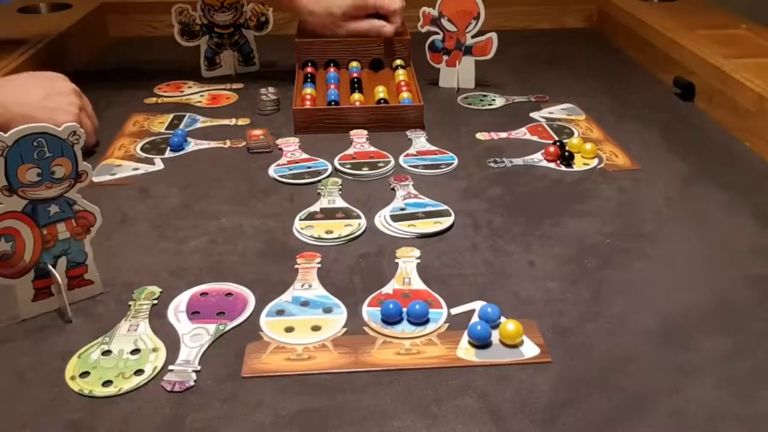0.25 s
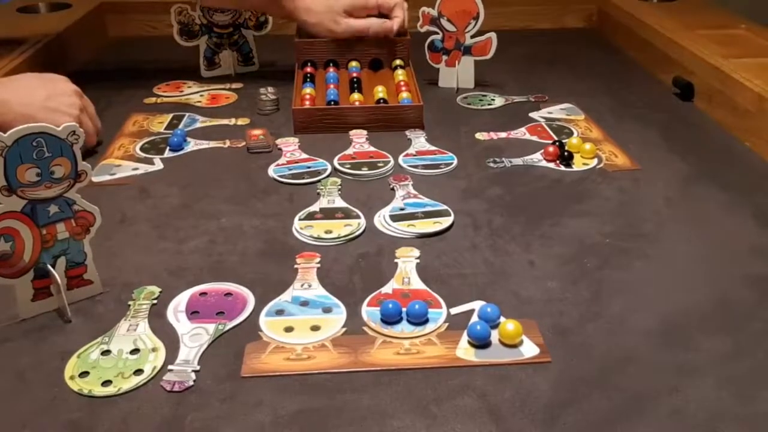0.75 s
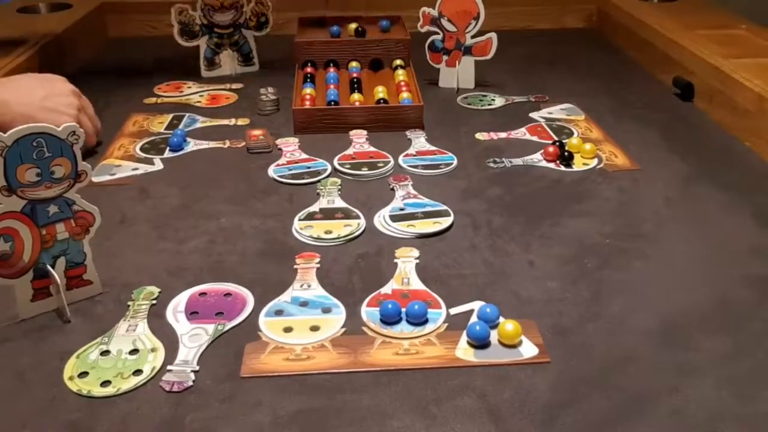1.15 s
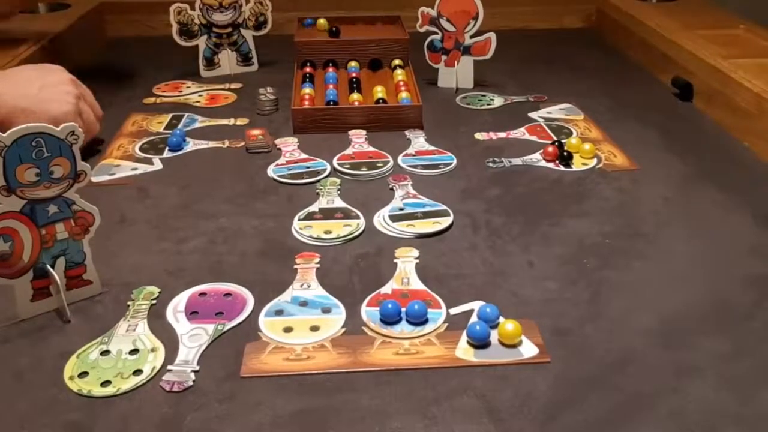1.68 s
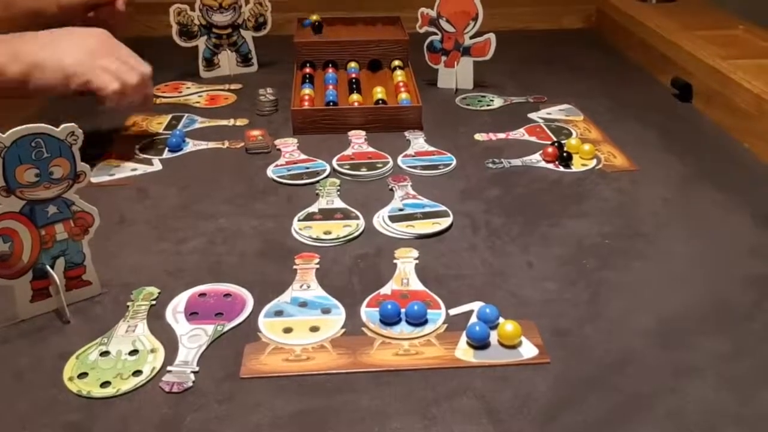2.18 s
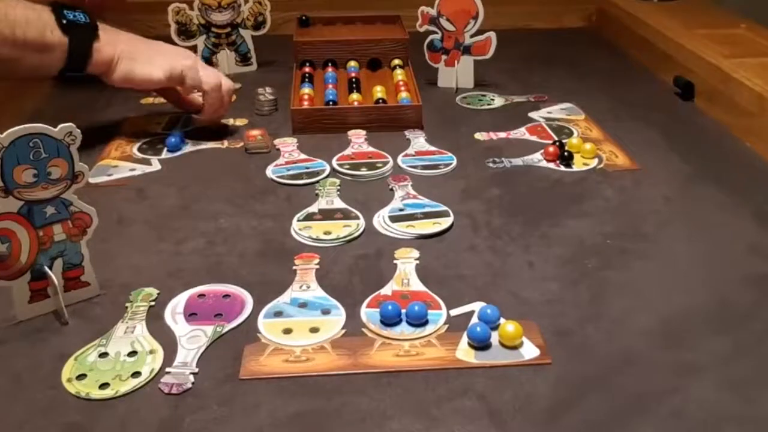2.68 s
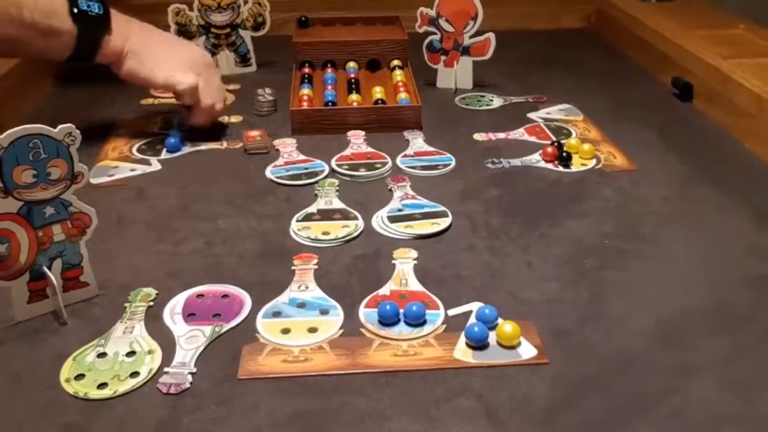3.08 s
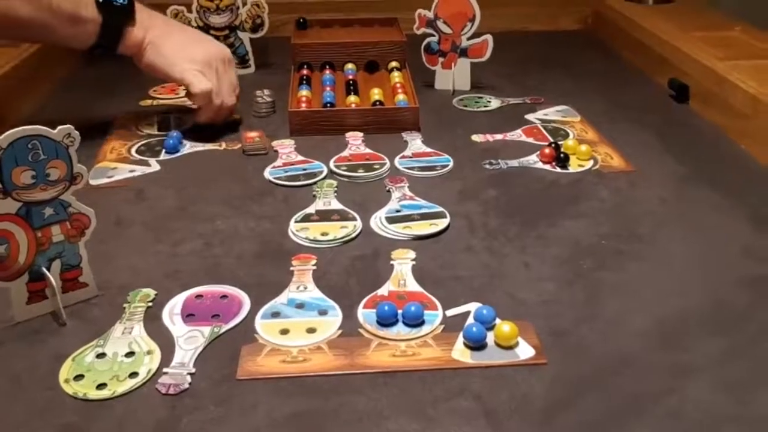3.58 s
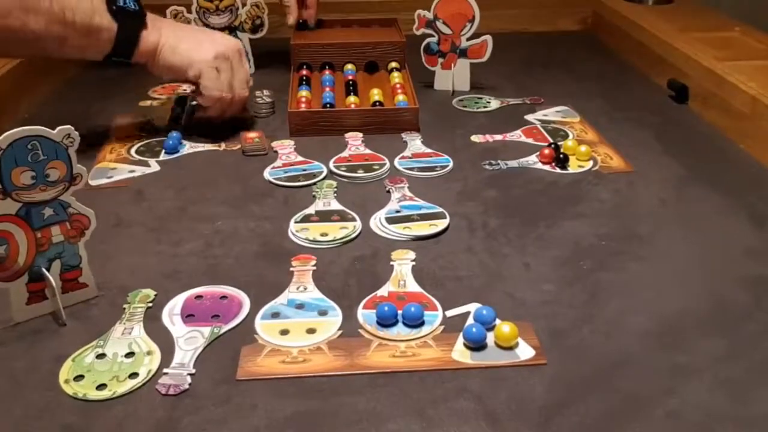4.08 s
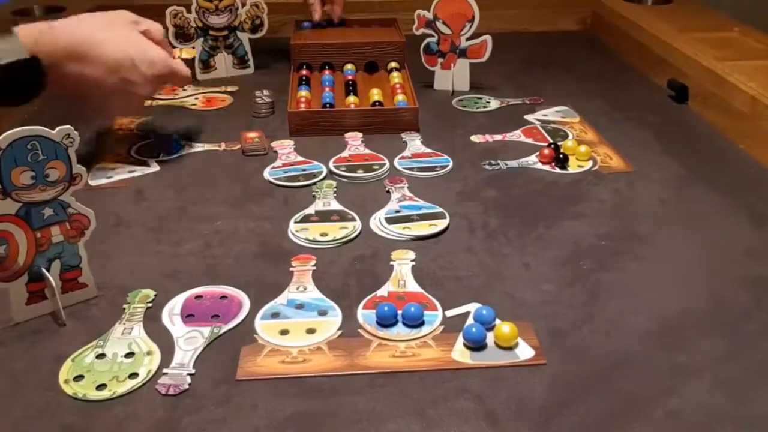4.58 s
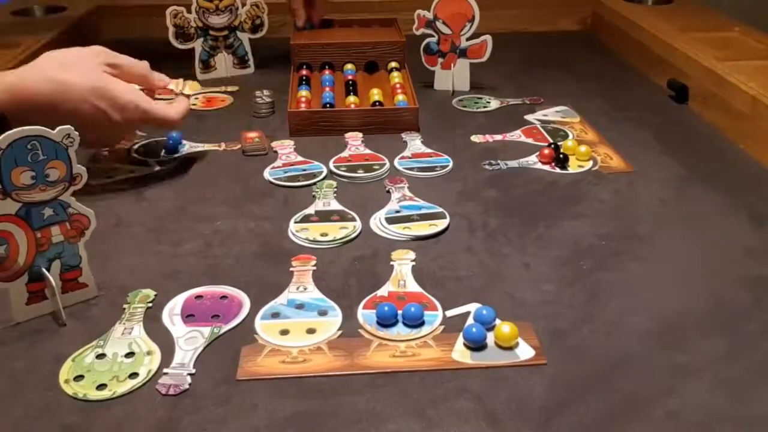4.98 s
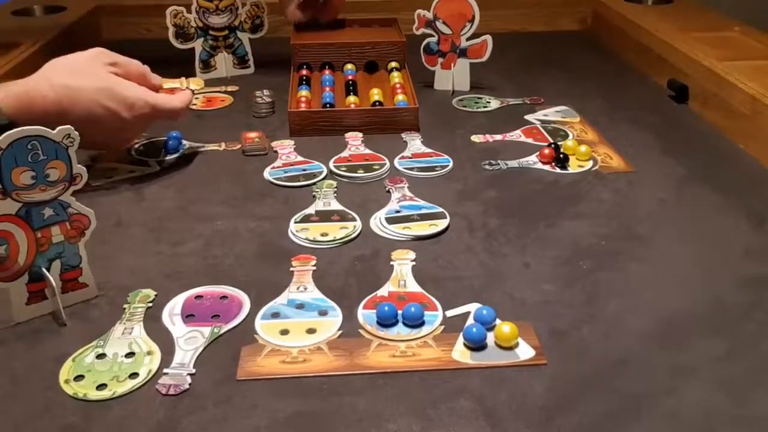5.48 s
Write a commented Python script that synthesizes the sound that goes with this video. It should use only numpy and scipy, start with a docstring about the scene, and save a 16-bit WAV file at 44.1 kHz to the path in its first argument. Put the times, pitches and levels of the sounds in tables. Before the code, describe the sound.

Fingers softly shift glass marbles in a palm, then several drop on a cardboard dispenser with sharp, hollow knocks. They roll and rattle down inside, clacking on other marbles, with another tumble soon after. A near-silent pause follows, then a faint hand rustle and a last short clatter. Soft bumps come from the padded table. Close stereo microphone in a small quiet room, box slightly left.

```python
"""Glass marbles drop on the lid of a cardboard dispenser, roll about, fall through holes and knock down the
chutes onto other marbles; hands rustle on the box and bump the padded table softly. Two microphone ports stand
close by in a small quiet room, the box a little to their left. Card is damped modes set ringing by knocks,
faint ticks and fine grains, glass is short shaped pulses with scatter, the table is low modes and dull noise,
the room a tail of noise and standing waves, and the background steady shaped noise."""
import sys
import numpy as np
from scipy import signal
from scipy.fft import rfft, irfft, next_fast_len
from scipy.io import wavfile

SR = 44100
rng = np.random.default_rng(int(sys.argv[2]) if len(sys.argv) > 2 else 0)


def digitize_waveform(pressure):
    """Quantize a signal to 16-bit integers and store it at the path in sys.argv[1].

    Rows of a 2-D input are taken as channels; values are limited to [-1, 1].
    """
    field = np.atleast_2d(pressure).T
    bounded = np.clip(field, -1, 1)
    quanta = np.round(bounded * 32767).astype(np.int16)
    wavfile.write(sys.argv[1], SR, quanta)


N = 253484


def from_db(db):
    """Decibels to gain."""
    return 10 ** (np.asarray(db) / 20)


def rms_one(x):
    """Scale to unit rms."""
    return x / np.sqrt(np.mean(x ** 2) + 1e-20)


def level(paths):
    """Summed gain in time of several level paths, each silent outside its own rows."""
    t, gain = np.arange(N) / SR, 0
    for rows in paths:
        s, db = np.transpose(rows)
        gain = gain + from_db(np.interp(t, s, db, left=-200, right=-200))
    return gain


def at_hz(points, hz):
    """Read a table on a log-frequency axis."""
    return np.interp(np.log(hz), np.log(np.array(points)[:, 0]), np.array(points)[:, 1])


def convolve(x, response):
    """Causal convolution, cut to length."""
    size = next_fast_len(N + response.shape[-1])
    return irfft(rfft(x, size) * rfft(response, size), size)[..., :N]


def band_pass(x, order, low_hz, high_hz):
    """Keep one band of a sound."""
    return signal.sosfilt(signal.butter(order, [low_hz, high_hz], "band", fs=SR, output="sos"), x)


def high_pass(x, order, hz):
    """Take the bass out of a sound."""
    return signal.sosfilt(signal.butter(order, hz, "high", fs=SR, output="sos"), x)


# Left-right likeness of diffuse sound at the two ports: pitch_hz, likeness [0 to 1]
PORT_LIKENESS = [(60, 0.48), (250, 0.94), (600, 0.35), (1500, 0.062), (12000, 0.015)]


def bands(size, shape):
    """Half-octave bands of stereo noise with diffuse likeness, each weighted by shape(hz)."""
    out, edges = 0, 20 * 2 ** np.arange(0, 10, .5)
    white = rng.standard_normal((2, 2, size))
    for k, (low, high) in enumerate(zip(edges, edges[1:])):
        mid, side = band_pass(white[k % 2], 2, low, high)
        hz = np.sqrt(low * high)
        alike = np.clip(at_hz(PORT_LIKENESS, hz), 0, 1)
        out = out + shape(hz) * (np.sqrt(1 + alike) * mid + np.sqrt(1 - alike) * side * [[1], [-1]])
    return out


def grains(per_s, spread_db):
    """Random small impacts of uneven size; rms 1."""
    sizes = from_db(spread_db * np.minimum(rng.exponential(1, N), 4)) * rng.choice([-1, 1], N)
    return rms_one(sizes * (rng.random(N) < per_s / SR))


def ring(clicks, hz, width_hz):
    """A click sets a damped sine ringing; the wider the mode, the faster it dies."""
    r, w = np.exp(-np.pi * width_hz / SR), 2 * np.pi * hz / SR
    return signal.lfilter([0, np.sin(w)], [1, -2 * r * np.cos(w), r * r], clicks + 1e-18)


# Card takes up a blow gradually: delay, and the extra width that sets how fast a mode swells
CARD_CONTACT_S, CARD_RISE_HZ = .0017, 645


def swell(clicks, hz, width_hz):
    """A damped sine that swells before it dies: a slow ring less a fast one."""
    return ring(clicks, hz, width_hz) - ring(clicks, hz, width_hz + CARD_RISE_HZ)


# Knocks of marbles on card, and faint ticks at 0.804 and 2.64 s, levels before later gains: start_s [s],
# ring_db [dB, ring of the card], pitch_hz [Hz, favoured pitch], click_db [dB, bright click],
# rest_db [dB, modes away from that pitch]
KNOCKS_AND_TICKS = [(0.214, -48.5, 364, -62, -13), (0.535, -8, 1460, -18, -6),
                    (.583, -7, 1474, -21.5, -9.5), (0.612, -14, 1300, -41, 5),
                    (0.634, -23.5, 1435, -29.5, -13), (0.746, -24, 1410, -36.5, -24),
                    (0.758, -26, 1430, -49, -18.5), (0.804, -35.5, 1430, -50.5, -11.5),
                    (.824, -1.5, 1483, -15, -12), (.844, -1.5, 1420, -18.5, -2.5),
                    (.862, -4, 1530, -16, -24), (.933, -17.5, 1300, -64.5, -8),
                    (.964, -19, 1004, -61.5, -1.5), (1.101, -32, 916, -54, -3.5),
                    (1.158, -24, 1300, -60, -10.5), (1.243, -27.5, 1328, -44, -3.5),
                    (1.359, -32, 1121, -57.5, -0.5), (1.406, -30.5, 1090, -56, 1),
                    (1.499, -30, 665, -50.5, 3.5), (1.557, -21, 1108, -34.5, -9.5),
                    (1.594, -15, 1400, -26.5, -7), (1.618, -16.5, 834, -61.5, -6.5),
                    (1.639, -3.5, 642, -16.5, -10.5), (1.675, -13.5, 1197, -47, -9),
                    (1.707, -9, 820, -20, 5.5), (1.808, -17.5, 1550, -35.5, -5),
                    (1.916, -18, 864, -26.5, -7), (2.026, -31, 824, -33.5, -2),
                    (2.208, -35, 1135, -60.5, -9.5), (2.312, -33, 1098, -60, -10.5),
                    (2.381, -29, 898, -48, -9), (2.43, -28.5, 837, -34, -10.5),
                    (2.502, -26.5, 850, -30, -7.5), (2.515, -28, 665, -47.5, -5),
                    (2.64, -44, 1507, -52.5, -9.5), (2.657, -2, 935, -15.5, -10),
                    (2.668, -5, 601.6, -27.5, -13), (2.723, -11, 1882, -33.5, -5.5),
                    (2.743, -5, 591, -22, -7.5), (2.798, -13.5, 993, -28.5, -2),
                    (2.913, -29, 3640, -41.5, -30), (4.072, -33, 840, -40.5, -13),
                    (4.086, -39, 670, -42, -37), (4.396, -33.5, 1847, -48.5, -20.5),
                    (4.437, -26, 1089, -36, -16), (4.486, -35, 1113, -53.5, -19.5),
                    (4.618, -11, 1243, -23, -10), (4.63, -17, 1138, -26, -10),
                    (4.66, 0.5, 642.6, -13.5, -6.5), (4.673, -25.5, 643, -52, -5),
                    (4.689, -24, 1420, -36.5, -6), (4.728, -17.5, 657, -57.5, -7.5),
                    (4.759, -7.5, 610, -24, -6), (4.802, -12, 950, -27.5, -4.5),
                    (4.828, -32.5, 3300, -39, -11), (4.867, -21, 2300, -39, -11.5),
                    (5.022, -42, 934, -54, -31), (5.209, -50, 921, -62, -10), (5.229, -53, 990, -64.5, -14),
                    (5.698, -27.5, 1350, -43.5, -10), (5.735, -33, 950, -43, -2)]


def strikes(gains):
    """One click per knock or tick, late by the contact time of card."""
    clicks = np.zeros(N)
    clicks[np.round((np.array(KNOCKS_AND_TICKS)[:, 0] + CARD_CONTACT_S) * SR).astype(int)] = gains
    return clicks


# Dispenser modes, before damping: pitch_hz [Hz], width_hz [Hz], level_db [relative dB]
BOX_MODES = [(114, 66, -16.5), (193.3, 4.8, -17.5), (280, 10, -12), (362.4, 24, -7), (454.6, 7.3, -13),
             (427, 160, -4.5), (483, 68, -8), (550, 71, -1.5), (595.6, 96, 0), (634, 460, 3),
             (671.5, 17, -3.5), (784.2, 39, 1), (835.6, 31, 2.5), (927, 43, -3), (1015, 53, 7.5),
             (1074, 63, 6.5), (1172, 49, 4), (1218, 100, 1), (1330, 62, 4), (1453, 39, 3), (1517, 150, 8.5),
             (1785, 110, -1), (1790, 110, -1), (1857, 51, 1.5), (2013, 51, -3.5), (2173, 70, 2),
             (2313, 100, 4.5), (2460, 82, 0), (2560, 360, -4.5), (2950, 130, -0.5), (3190, 28, -7),
             (3250, 96, -9.5), (3602, 70, -8.5), (4170, 80, -9), (4670, 87, -6)]
HOLLOW_TOP_HZ = 1200   # modes of the hollow lie below, those of the panels above
# A blow on the hollow also rings a panel, higher up; the answer shifts with the strength of the blow
PANEL_ANSWER_DB, OVERTONE, PANEL_LOW_HZ, PANEL_TOP_HZ = 0, 2.1, 1745, 2040
PANEL_PER_DB, FIRM_KNOCK_DB = -0.1241, -11
HOLLOW_ANSWER_DB, HOLLOW_ANSWER_HZ = -10.5, 932   # a blow on a panel also rings the hollow
ANSWER_FOLLOWS = 0.3   # a blow that keeps to its spot also reaches the other part of the box less
LID_HZ, LID_OCTAVES, LID_SHARE = 363, .15, 0.54   # the whole lid flexes under landing marbles


def lid_flex(hz):
    """How much each mode shares in the flexing of the whole lid."""
    return 1 / (1 + (np.log2(hz / LID_HZ) / LID_OCTAVES) ** 2)


def knock_gains(reach_octaves=0.091):
    """Each knock or tick (row) favours the modes (columns) near its own pitch, in hollow and panel."""
    _, peak, pitch_hz, _, rest_db = np.array(KNOCKS_AND_TICKS).T[:, :, None]
    hz, _, db = np.transpose(BOX_MODES)
    deep, low = pitch_hz < HOLLOW_TOP_HZ, hz < HOLLOW_TOP_HZ
    kept_db = ANSWER_FOLLOWS * (rest_db + 8)
    panel_answer_db = PANEL_ANSWER_DB + PANEL_PER_DB * (peak - FIRM_KNOCK_DB) + kept_db
    hollow_db = np.where(deep, 0, HOLLOW_ANSWER_DB + kept_db)
    panel_db = np.where(deep, panel_answer_db, 0)
    hollow_hz = np.where(deep, pitch_hz, HOLLOW_ANSWER_HZ)
    panel_hz = np.where(deep, np.clip(OVERTONE * pitch_hz, PANEL_LOW_HZ, PANEL_TOP_HZ), pitch_hz)
    away = np.log2(hz / np.where(low, hollow_hz, panel_hz)) / reach_octaves
    heft = np.where((hz < 700) & deep, from_db(0.27 * (peak + 15.0)), 1)   # heavy blows move the whole box
    rest = from_db(rest_db)
    spot = rest * heft + 1 / (1 + away ** 2) ** 2   # every mode answers a little
    spot = spot + LID_SHARE * lid_flex(hz) * rest * ~deep
    side = np.sign(rng.standard_normal(away.shape))   # the spot lies on either side of a mode's nodal lines
    share = from_db(db + 2.5 * rng.standard_normal(away.shape)) * spot * side
    hollow_norm = np.linalg.norm(share * low, axis=1, keepdims=True)
    panel_norm = np.linalg.norm(share * ~low, axis=1, keepdims=True)
    share = share / np.where(low, hollow_norm, panel_norm)
    return share * from_db(peak + np.where(low, hollow_db, panel_db))


# Heavy blows shove the whole box; the thump grows faster than the blow
THUMP_HZ, THUMP_WIDTH_HZ, THUMP_DB, THUMP_GROWTH = 470, 370, -5, 1.0


def box_thump():
    """Knocks on the hollow shove the whole box: one broad, short, dull mode."""
    _, peak, pitch_hz, _, _ = np.transpose(KNOCKS_AND_TICKS)
    gains = (pitch_hz < HOLLOW_TOP_HZ) * from_db(peak + THUMP_DB + THUMP_GROWTH * (peak + 4))
    return swell(strikes(gains), THUMP_HZ, THUMP_WIDTH_HZ)


# Fine contact on card, before later gains: marbles rolling, and in the second path (4.0 to 4.07 s)
# a hand rustling on the box; one path per list: start_s [s], level_db [dB]
ROLLS_AND_HAND_RUSTLE = [
    [(.6, -54.5), (.72, -41), (.82, -48), (1.0, -44), (1.12, -43), (1.25, -43), (1.4, -48), (1.55, -43),
     (1.66, -34.5), (1.76, -28), (1.9, -51), (2.05, -45.5), (2.18, -57.5), (2.24, -49.5), (2.4, -48.5),
     (2.55, -52.5), (2.64, -66.5)],
    [(4.0, -85), (4.02, -64.5), (4.07, -83)],
    [(2.67, -50), (2.78, -42), (2.86, -47.5), (2.95, -48)],
    [(4.67, -33.5), (4.79, -39.5), (4.9, -55), (5.05, -60), (5.19, -80), (5.23, -68), (5.35, -97)],
]
FINE_TOP_HZ = 2600   # fine contact is too soft to ring the highest modes
LID_FINE_SHARE, LID_CLEAR_S = 2.5, 1.5   # the lid flexes under rolling marbles until the last ones leave it


def box(damping=1.523, fine_db=-36.5, fine_hz=890.0):
    """Knocks, ticks and the fine impacts of rolling and of a rustling hand ring the damped modes of the card."""
    hz, width_hz, db = np.transpose(BOX_MODES)
    gains = knock_gains()
    contact = level(ROLLS_AND_HAND_RUSTLE) * grains(per_s=500.0, spread_db=6.5)
    lid = 0.12 + 1 / (1 + (np.log2(hz / fine_hz) / 0.92) ** 2)   # fine contact drives the lid's own band
    soft = from_db(db + fine_db) * lid / (1 + (hz / FINE_TOP_HZ) ** 6)
    on_lid = np.arange(N) / SR < LID_CLEAR_S
    flexing = 1 + LID_FINE_SHARE * lid_flex(hz) ** 2 / lid
    rings = box_thump()
    for k in range(len(hz)):
        # each mode meets the grains a few samples later than the last
        rubbed = soft[k] * np.where(on_lid, flexing[k], 1) * np.roll(contact, 7 * k)
        rings = rings + swell(strikes(gains[:, k]) + rubbed, hz[k], damping * width_hz[k])
    return high_pass(rings, 4, 95.)   # a small box radiates no deep bass


# Marbles clacking on each other, before later gains: start_s [s], top_db [dB, top of the click],
# straight_db [dB, part that comes straight], top_hz [Hz, where the top starts], body_db [dB against the top]
MARBLE_CLACKS = [(0.059, -52, -17, 5150, -14), (0.254, -46.5, -19, 5960, -9),
                 (0.309, -50, -15.5, 5850, -6.5), (0.366, -47, -21.5, 5820, -7),
                 (0.466, -42.5, -20, 5620, -14), (0.485, -47, -14.5, 5630, -15),
                 (1.213, -65.5, -12.5, 5900, 16), (1.674, -18.5, -30, 6000, -18),
                 (2.377, -37, -16.5, 6000, -9), (2.72, -27.5, -20.5, 6100, -7.5),
                 (2.913, -32, -6, 6980, -6), (4.729, -30.5, -17, 6040, -22.5), (4.867, -31, -5.5, 6720, -7)]
# Click of glass: pitch_hz [Hz], level_db [relative dB per Hz]
GLASS_COLOUR = [(150, -23), (500, -1.5), (1500, 4.5), (2500, 5.5), (4000, 7.5), (5500, 2.5), (7500, -3),
                (10000, -11), (13000, -13), (15000, -30.5), (16500, -24)]
CONTACT_S = .0018   # delay for a contact to build up
SHEEN_HZ = 6000   # the top of a knock's click starts here
# Card dulls the top of a click, the more the softer it is
KNOCK_SHEEN_DB, SHEEN_PER_DB, FIRM_CLICK_DB = -8.5, 0.1, -18
KNOCK_STRAIGHT_DB = -15   # the walls of the box hide part of each click from view
KNOCK_SCATTER_S, CLACK_SCATTER_S = 0.01, .002   # a click inside the box scatters longer


def glass_clicks(scatter=4.02, beam_db=5.0, click_db=3.0):
    """A sharp pulse and its scatter off nearby marbles; returns direct sound and room feed."""
    knocks = [(s, db, db + KNOCK_SHEEN_DB + SHEEN_PER_DB * (db - FIRM_CLICK_DB),
               KNOCK_STRAIGHT_DB, KNOCK_SCATTER_S, SHEEN_HZ) for s, _, _, db, _ in KNOCKS_AND_TICKS]
    clacks = [(s, db + body_db, db, straight_db, CLACK_SCATTER_S, top_hz)
              for s, db, straight_db, top_hz, body_db in MARBLE_CLACKS]
    s, click, sheen, in_view, scatter_s, top_hz = np.array(knocks + clacks).T[:, :, None]
    size = 256
    t, hz = np.arange(size) / SR, np.maximum(np.fft.rfftfreq(size, 1 / SR), 100)
    shape, top = from_db(at_hz(GLASS_COLOUR, hz)), 1 / (1 + (top_hz / hz) ** 6)
    body, shine = [shape * part / np.linalg.norm(shape * part, axis=1)[:, None] for part in (1 - top, top)]
    colour = from_db(click + click_db) * body + from_db(sheen + click_db) * shine
    echoes = scatter * rng.standard_normal((len(s), size)) * np.exp(-t / scatter_s) / (scatter_s * SR) ** .5
    echoes[:, [0, 50]] += .8, .55   # the pulse and its bounce off the table
    beam = from_db(beam_db * top)   # the treble is aimed at the listener more than at the walls
    bursts = np.roll(irfft(colour), 32, axis=1) * 200   # unit energy raised to an rms over a few ms
    aimed = irfft(rfft(bursts) * rfft(echoes) * beam) * from_db(in_view)
    direct, spread = np.zeros((2, N + 512))
    for at, burst, seen in zip(np.round((s[:, 0] + CONTACT_S) * SR).astype(int), bursts, aimed):
        spread[at:at + size] += burst
        direct[at:at + size] += seen
    return direct[:N], spread[:N]


# Fingers shifting marbles in the palm, one path per list: start_s [s], level_db [dB before the mix]
PALM_RUSTLE = [
    [(0, -45.5), (.05, -73), (.2, -62), (.3, -55), (.53, -65)],
    [(4.0, -89.5), (4.02, -62), (4.07, -74)],
]


def fine_rubbing(grit_db=-14.0):
    """Rubbing in the palm, and grit of the rolling and hand rustle on card: dense small treble impacts."""
    rub = band_pass(grains(per_s=1500., spread_db=5.0), 2, 3800, 11000)
    grit = band_pass(grains(per_s=2900.0, spread_db=-2.0), 1, 2500, 5000)
    return level(PALM_RUSTLE) * rub + from_db(grit_db) * level(ROLLS_AND_HAND_RUSTLE) * grit


# Hands and arms leaning on the table, one path per list: start_s [s], level_db [dB before the mix]
TABLE_LEANS = [
    [(0.15, -102), (0.206, -48), (0.5, -64)],
    [(3.2, -67.5), (3.67, -76), (3.8, -76.5)],
    [(4.95, -56.5), (5.252, -53.5), (5.4, -76)],
]
# Dull noise of the table: pitch_hz [Hz], level_db [relative dB per Hz]
THUD_COLOUR = [(12, -42), (20, -9.5), (65, 8.5), (151, -8), (189, 6.5), (325, -12), (359, -4), (520, -22),
               (600, -4), (780, -43), (1320, -120)]
# Bumps felt through the table top, before later gains: start_s [s], peak_db [dB], pitch_hz [Hz]
TABLE_BUMPS = [(0.224, -44, 57.2), (0.304, -71.5, 182.7), (0.546, -37, 108.5), (0.62, -38.5, 96.3),
               (0.759, -39.5, 63.84), (0.872, -35.5, 172), (1.644, -38, 85.5), (1.715, -52, 107.4),
               (2.022, -44, 199), (2.438, -42, 194.7), (2.512, -48.5, 117.6), (2.67, -33, 110.1),
               (2.831, -51, 188.2), (3.604, -43, 63.6), (4.109, -52.5, 160), (4.628, -48.5, 130),
               (4.67, -42.5, 105), (4.689, -43.5, 188.7), (4.815, -45, 185), (5.018, -47.5, 130),
               (5.145, -49.5, 107.8), (5.172, -49.5, 126.4), (5.213, -50.5, 265), (5.222, -41, 70),
               (5.727, -48.5, 165)]
# Table-top modes: pitch_hz [Hz], width_hz [Hz]
TABLE_MODES = [(65, 14), (104, 15), (127, 3.6), (187, 19), (262, 6.7)]


def table(bump_db=4.5, rumble_db=-62.0):
    """Arms and fine contact on the box rumble in the table; bumps ring most the modes near their pitch."""
    s, peak, pitch_hz = np.transpose(TABLE_BUMPS)
    out = level(TABLE_LEANS) * rms_one(bands(N, lambda hz: from_db(at_hz(THUD_COLOUR, hz))))
    soft = np.hanning(200) / 100   # flesh and padding stretch the blow
    rumble = from_db(rumble_db) * level(ROLLS_AND_HAND_RUSTLE) * grains(per_s=270.0, spread_db=1.0)
    for hz, width_hz in TABLE_MODES:
        clicks = rumble * width_hz * (hz > 100)
        nearness = 1 / (1 + (np.log2(pitch_hz / hz) / 0.35) ** 2)
        clicks[np.round(s * SR).astype(int)] = from_db(peak + bump_db) * nearness
        out = out + ring(np.convolve(clicks, soft)[:N], hz, width_hz)
    return out


# Standing waves between the table's rim and the walls: pitch_hz [Hz], level_db [relative dB]
STANDING_WAVES = [(186, -8.5), (260, -6), (363, -2.5), (405, -4.5), (446, -0.5), (508, 0.5), (550, -2),
                  (590, 0), (612, -1.5), (670, 1.5), (703, -7), (797, -0.5), (855, -1), (896, 1.5),
                  (918, 1), (1000, 2), (1080, -0.5), (1130, 2.5), (1201, 2), (1320, 0), (1370, -1),
                  (1449, -2.5), (1534, -4), (1836, -2.5), (1920, -3.5), (2141, -2)]
# Share against the diffuse tail, decay, phase shift of each port, one way or the other, in radians per kHz
# (capped at 1 radian; the step between the ports is twice this)
RECESS_DB, RECESS_T60_S, RECESS_SKEW = -12.5, .21, 0.81


def standing_waves(t):
    """Sines that die together, each with its phase skewed between the two ports."""
    hz, db = np.transpose(STANDING_WAVES)[:, :, None]
    phase = 2 * np.pi * rng.random(hz.shape)
    skew = np.minimum(RECESS_SKEW * hz / 1000, 1) * rng.choice([-1, 1], hz.shape)
    waves = np.array([np.sum(from_db(db) * np.sin(2 * np.pi * hz * t + phase + way * skew), axis=0)
                      for way in (1, -1)])
    return waves * from_db(-60 * t / RECESS_T60_S)


# Decay of the room: pitch_hz [Hz], t60_s [s]
ROOM_DECAY = [(100, 0.74), (300, 0.3), (800, 0.28), (2000, 0.37), (5000, 0.31), (13000, 0.28)]
# Where standing waves rule, less of the tail is diffuse: pitch_hz [Hz], level_db [relative dB]
DIFFUSE_SHARE = [(150, 0), (330, -5), (1300, -5), (2500, 0)]
EARLY_DB, EARLY_S = -7, 0.0029   # slight raise of the first reflections, which swell in over a few ms


def room(dry, gap_s=0.0019, rise_s=0.0052):
    """Dense reflections swell in after a short gap: noise dying band by band, coloured by standing waves."""
    t = np.arange(int(.7 * SR)) / SR
    tail = bands(len(t), lambda hz: from_db(at_hz(DIFFUSE_SHARE, hz) - 60 * t / at_hz(ROOM_DECAY, hz)))
    tail = tail * (1 + from_db(EARLY_DB) * np.exp(-t / EARLY_S))
    waves = standing_waves(t)
    tail = tail / np.linalg.norm(tail[0]) + from_db(RECESS_DB) * waves / np.linalg.norm(waves[0])
    tail = tail * np.clip((t - gap_s) / rise_s, 0, 1)
    return convolve(dry, tail / np.linalg.norm(tail[0]))


# Room hum and microphone hiss: pitch_hz [Hz], level_db [relative dB per Hz]
QUIET_COLOUR = [(12, -30), (20, -4), (128, -6), (156, -9), (428, -26.5), (616, -26), (1020, -32),
                (1430, -30.5), (2440, -31.5), (13600, -37.5), (16500, -35)]
QUIET_DB = -64.5   # rms at the microphone, before record()


def quiet():
    """Room hum and microphone hiss as steady shaped noise."""
    return from_db(QUIET_DB) * rms_one(bands(N, lambda hz: from_db(at_hz(QUIET_COLOUR, hz))))


LEFT_DB = 4   # near sound is this much stronger in the left port


def scene():
    """Marbles and box, near and through the room, over table and background."""
    card, (clicks, spread), fine = box(), glass_clicks(), fine_rubbing()
    wet = room(from_db(3.5) * card + from_db(-2.5) * (spread + fine))
    close = card + clicks + fine
    near = np.array([close, np.roll(close, 1)])   # the right port hears the box a sample later
    return near * from_db([[LEFT_DB / 2], [-LEFT_DB / 2]]) + wet + table() + quiet()


CUTOFF_HZ = 16600


def record(dry):
    """The microphone drops the deepest bass, peaks are rounded, the top is cut."""
    rounded = 1.283 * np.tanh(high_pass(dry, 2, 38.) / 1.908)
    return signal.sosfilt(signal.cheby2(12, 70, CUTOFF_HZ, fs=SR, output="sos"), rounded)


dry = scene()
out = record(dry)
digitize_waveform(out)
```